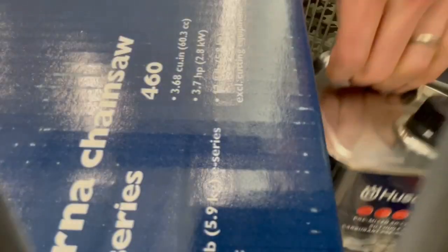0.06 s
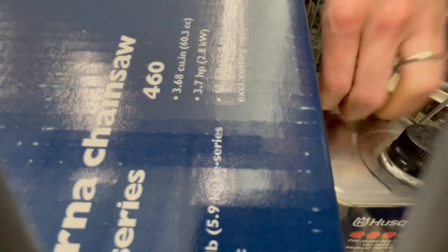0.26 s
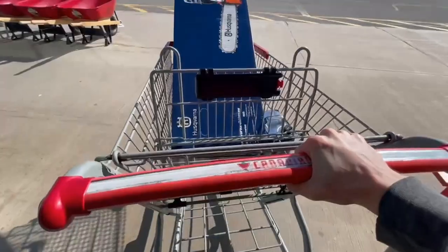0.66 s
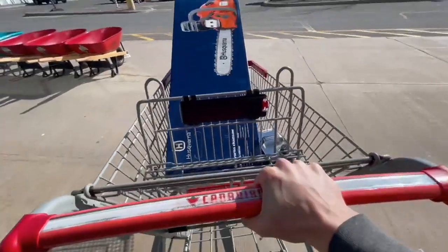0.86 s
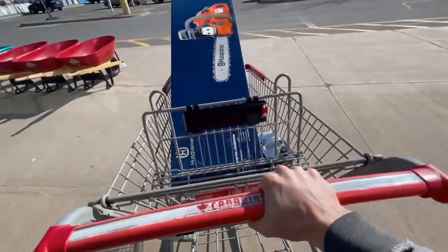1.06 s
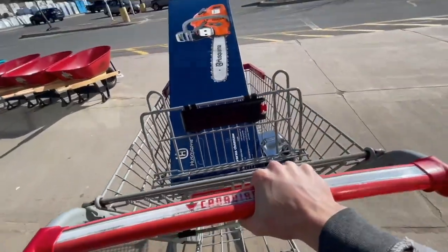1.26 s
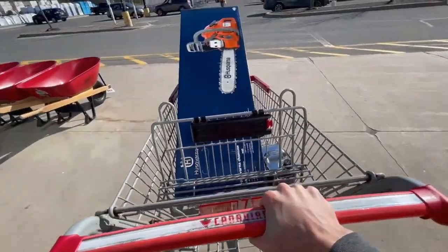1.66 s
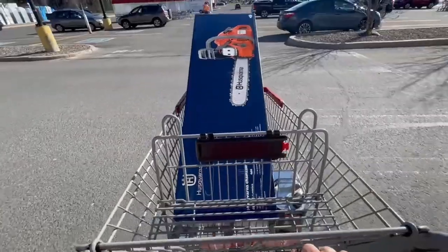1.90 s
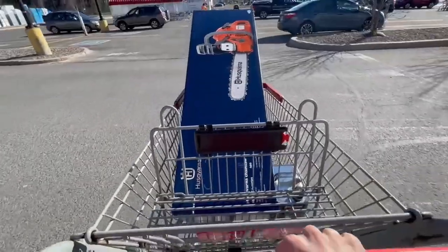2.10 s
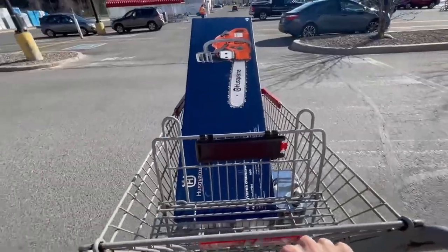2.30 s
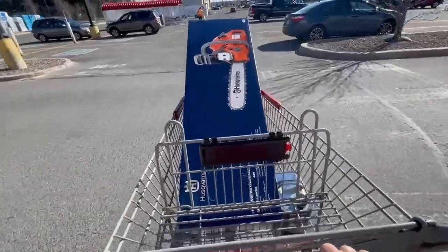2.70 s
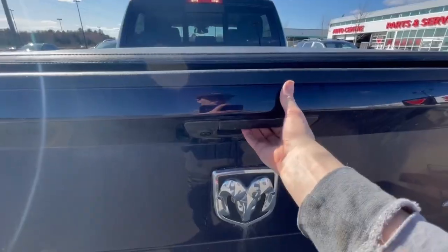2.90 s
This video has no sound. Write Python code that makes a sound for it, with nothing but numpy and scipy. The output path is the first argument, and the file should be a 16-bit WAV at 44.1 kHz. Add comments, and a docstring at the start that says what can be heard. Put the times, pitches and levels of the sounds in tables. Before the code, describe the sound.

A metal shopping cart rattling is the main sound. First, at 0.1 seconds, a box thuds into the basket, ringing and echoing in a store. From 0.6 seconds the cart rolls loudly outdoors, with chattering wires, rumbling wheels, crashing bumps and wind on the microphone. It eases around 1.4, then resumes, grittier, on asphalt. At 2.8 it cuts to a quiet car park; a tailgate handle clicks at 3 seconds.

```python
"""A thud in a large store, then a shopping cart rattling along outdoors, then a quiet car park.
A boxed load lands in the wire cart: box and basket floor ring, and the store echoes. Cut to the cart
rolling over concrete slabs on to rough asphalt: a hail of tiny knocks makes the basket wires chatter,
the frame drone and the wheels rumble, while bumps crash through the basket and wind buffets the
microphone. Cut to the car park, with a little wind and the click of a handle."""
import sys
import numpy as np
from scipy import signal
from scipy.fft import rfft, irfft, next_fast_len
from scipy.io import wavfile
from scipy.ndimage import uniform_filter1d, map_coordinates

SR = 44100
rng = np.random.default_rng(int(sys.argv[2]) if len(sys.argv) > 2 else 0)


def waveform_to_disk(signal):
    """Save audio, clipped to [-1, 1], as 16-bit WAV at the path in sys.argv[1]."""
    frames = np.transpose(np.atleast_2d(signal))
    scaled = np.clip(frames, -1, 1) * 32767
    samples = np.round(scaled).astype(np.int16)
    wavfile.write(sys.argv[1], SR, samples)


N = 134505
TIME = np.arange(N) / SR
ROLL_START_S, ROLL_END_S = .601, 2.774
HITS_PER_S, TICK_T60_S = 1400, 0.025

# the load lands and rocks (time [s], strength [dB], low-pass cutoff of the contact [Hz])
THUDS = [(.107, 1, 7150), (0.137, -16.5, 1210), (.156, -6.5, 1950), (.189, -11, 900), (0.235, -18, 900)]
# bumps that throw all the wires at once (time [s], strength [dB])
JOLTS = [(.602, -13.5), (.614, -14), (.646, -21), (.703, -4), (.792, -13), (.818, -4), (.848, -6.5),
         (.935, -12), (1.025, -19), (1.057, -9), (1.142, -13), (1.232, -25), (1.423, -28), (1.44, -19.5),
         (1.569, -19), (1.612, -11.5), (1.644, -14), (1.701, -17), (1.953, -5), (2.135, -7), (2.157, -11),
         (2.423, -29), (2.603, -21), (2.731, -9), (2.752, -4)]
# the clearest basket wires (frequency [Hz], level [dB], t60 [s])
WIRE_MODES = [(684, -4, 0.15), (831.5, 4, 0.19), (1857, 3.5, 0.17), (2433, -6.5, 0.17), (3880, -1, 0.087),
              (4370, 1.5, 0.082), (5040, 2.5, 0.25), (5410, 4, 0.13), (6120, -1, 0.12), (7900, 13, 0.19),
              (12330, 2, .1)]
# low-end tone of the wheels and of the car park gust (frequency [Hz], level [dB])
RUMBLE_TONE = [(20, -52), (38, -14), (54, 0.5), (80, 0), (110, -2), (150, -6), (300, -14.5), (900, -81.5)]
# tone of scuffs and rustles (frequency [Hz], level [dB])
RUSTLE_TONE = [(200, -5), (700, 4.5), (2200, -10), (4000, -11.5), (12000, -26.5)]
# stereo image of the rolling cart (frequency [Hz], left-right likeness [capped at +-0.97 in use])
CART_IMAGE = [(60, 0.19), (300, 0.26), (650, 0.046), (1300, 0.71), (2100, 0.76), (3200, 0.26), (4100, 0.35),
              (5600, 0.047), (6600, -0.34), (7400, -2.32), (8600, -0.26), (9700, 0.19), (10700, 1),
              (12000, 0.96), (13400, -1.61), (16000, -0.66)]
# stereo image of store and car park (frequency [Hz], left-right likeness [-1 to 1])
AMBIENT_IMAGE = [(80, 0.24), (400, 0.32), (1500, 0.24), (3200, -0.12), (12000, 0.11)]


def from_db(db):
    """Decibels to gain."""
    return 10 ** (np.asarray(db) / 20)


def rms_one(x):
    """Scale to unit rms."""
    return x / np.sqrt(np.mean(x ** 2) + 1e-20)


def unit_energy(x):
    """Scale each channel to unit energy."""
    return x / np.sqrt(np.sum(x ** 2, axis=-1, keepdims=True) + 1e-20)


def faders(rows):
    """One gain curve for each level column of (time [s], level [dB], ...)."""
    times, *columns = np.transpose(rows)
    return [from_db(np.interp(TIME, times, db)) for db in columns]


def at_hz(points, hz):
    """Read a table on a log-frequency axis."""
    freqs, values = np.transpose(points)
    return np.interp(np.log(hz + 1), np.log(freqs), values)


def convolve(x, response):
    """Play a signal through a response."""
    return signal.fftconvolve(np.atleast_2d(x), response, axes=-1)[:, :N]


def colour(x, tone):
    """Minimum-phase EQ with the given tone curve; white noise keeps its power."""
    size = 2 * next_fast_len(N, True)
    magnitude = rms_one(from_db(at_hz(tone, np.fft.rfftfreq(size, 1 / SR))))
    cepstrum = irfft(np.log(magnitude))
    cepstrum[1:size // 2] *= 2
    cepstrum[size // 2 + 1:] = 0
    return irfft(rfft(x, size) * np.exp(rfft(cepstrum)))[..., :N]


def stereo(pair, image):
    """Two unrelated signals become mid and side, balanced by frequency."""
    size = 2 * next_fast_len(N, True)
    alike = np.clip(at_hz(image, np.fft.rfftfreq(size, 1 / SR)), -.97, .97)
    mid, side = irfft(rfft(pair, size) * np.sqrt([(1 + alike) / 2, (1 - alike) / 2]))[:, :N]
    return np.array([mid + side, mid - side])


def drift(hz):
    """Slow random modulation at unit rms."""
    pole = np.exp(-2 * np.pi * hz / SR)
    return rms_one(signal.lfilter([1], [1, -2 * pole, pole * pole], rng.standard_normal(N + SR))[SR:])


def clicks(rows):
    """Impulses from (time [s], level [dB])."""
    out = np.zeros(N)
    for s, db in rows:
        out[int(s * SR)] += from_db(db)
    return out


def knocks(per_s, spread_db=2):
    """Random contacts of uneven strength, at unit rms."""
    sizes = from_db(spread_db * np.minimum(rng.exponential(1, N), 4)) * rng.choice([-1, 1], N)
    return rms_one(sizes * (rng.random(N) < per_s / SR))


def burst(t60):
    """Countless short modes blur into a pair of dying noises."""
    t = TIME[:SR // 6]
    return unit_energy(rng.standard_normal((2, len(t))) * from_db(-60 * t / t60))


def ringing(modes):
    """Modes (frequency [Hz], level [dB], t60 [s]) reach two points with random phases."""
    t = TIME[:SR // 6]
    phases = rng.uniform(0, 2 * np.pi, (len(modes), 2, 1))
    return unit_energy(sum(from_db(db - 60 * t / t60) * np.sin(2 * np.pi * hz * t + phase)
                           for (hz, db, t60), phase in zip(modes, phases)))


def bonks(rows, t60, attack_s=0.0047):
    """Short, solid low tones from (time [s], level [dB], pitch [Hz])."""
    out = 0
    for s, db, hz in rows:
        t = np.maximum(TIME - s, 0)
        envelope = from_db(db - 60 * t / t60) * (1 - np.exp(-t / attack_s))
        out = out + envelope * np.sin(2 * np.pi * hz * t)
    return out


def air(tone, db=0):
    """A steady, wide bed of noise."""
    return from_db(db) * stereo(colour(rng.standard_normal((2, N)), tone), AMBIENT_IMAGE)


def car_park():
    """Open air, a puff of wind on the microphone and a handle being gripped."""
    # outdoor bed and handle tone (frequency [Hz], level [dB])
    air_tone = [(25, -15), (60, 0.5), (110, 1), (180, -11), (330, -6), (520, -17.5), (900, -18),
                (1400, -29), (3000, -40), (7000, -52), (14000, -54)]
    handle_tone = [(300, 12), (900, -1.5), (2200, -4), (5000, -16.5), (12000, -24)]
    # puff of wind (time [s], level [dB], half length [s])
    gusts = [(2.86, -31.5, 0.044)]
    # faint rustle on the way to the handle (time [s], level [dB])
    rustle_level = [(2.8, -51.5), (2.875, -64), (2.895, -53), (2.97, -53), (3.03, -43)]
    # fingers on the handle, then the latch (time [s], level [dB])
    handle_clicks = [(2.9, -23), (2.91, -21.5), (2.94, -27), (3.046, -5.5)]
    gust = sum(from_db(db) * np.exp(-((TIME - s) / half_s) ** 2) for s, db, half_s in gusts)
    handle = colour(convolve(clicks(handle_clicks), burst(t60=0.1)), handle_tone)
    rustle, = faders(rustle_level)
    background = air(air_tone, db=-37) + rustle * air(RUSTLE_TONE) + gust * air(RUMBLE_TONE)
    return background + from_db(12) * stereo(handle, AMBIENT_IMAGE)


def store_air():
    """The steady room tone of the store."""
    # indoor bed (frequency [Hz], level [dB])
    air_tone = [(18, -28), (30, 3.5), (336, -2.5), (1490, -21.5), (1880, -22), (2630, -30), (3870, -25),
                (12600, -45.5), (14000, -60)]
    return air(air_tone, db=-41.5)


def store_echo():
    """Diffuse reverb of the store, with a decay time for each octave."""
    # reverb decay (frequency [Hz], t60 [s])
    decay = [(60, 1), (160, 1), (420, 1.0), (1500, 0.88), (2900, 0.42), (7700, 0.46)]
    t, out = TIME[:SR], 0
    for low_hz in 30 * 2 ** np.arange(9):
        octave = signal.butter(2, [low_hz, 2 * low_hz], "band", fs=SR, output="sos")
        band = signal.sosfilt(octave, rng.standard_normal((2, SR)))
        out = out + band * from_db(-60 * t / at_hz(decay, low_hz * np.sqrt(2)))
    build_up = 1 - np.exp(-t / 0.0076)
    return unit_energy(out * build_up)


def scuff():
    """The load scuffs faintly in the hand before it drops."""
    # scuff envelope (time [s], level [dB])
    scuff_level = [(.012, -72), (.018, -40), (.04, -55), (.095, -50.5), (.106, -30), (.12, -80)]
    level, = faders(scuff_level)
    return level * air(RUSTLE_TONE)


def box_ring():
    """The landing sets box and basket floor ringing; the two lowest modes beat."""
    # box and basket floor (frequency [Hz], level [dB], t60 [s])
    box_modes = [(79.8, 2, 0.3), (96, 2, 0.34), (133.4, -9, 0.52), (242, 6, 0.13), (288.3, -4, 0.74),
                 (322.5, -8.5, 0.92), (351, -7, 0.39), (476, -2, 0.075), (558, -12, 1.15), (579, -4, 0.85),
                 (609, -8, 0.63), (833, -5, 0.24), (1270, -9.5, 0.51), (1650, -13.5, 0.28),
                 (2497, -9, 0.12), (5280, -14, 0.12), (4895, -39.5, 3.6)]
    t = np.maximum(TIME - THUDS[0][0], 0)
    out = 0
    for k, (hz, db, t60) in enumerate(box_modes):
        pan = from_db(-6) * rng.uniform(-1, 1) * np.array([[1], [-1]])
        out = out + (-1) ** k * (1 + pan) * from_db(db - 60 * t / t60) * np.sin(2 * np.pi * hz * t)
    return out


def thud():
    """The load lands with a crack, the box booms as it rocks back, and the store echoes."""
    # tone of the impact and of its reverb tail (frequency [Hz], level [dB])
    crack_tone = [(60, -11), (165, -12), (260, 5.5), (410, -1.5), (550, 9), (730, -5), (1000, -4),
                  (1650, -5), (2150, -19), (2600, -17.5), (3600, -20), (5200, -19), (8500, -15.5),
                  (15000, -29)]
    tail_tone = [(50, 0.5), (100, 3.5), (175, -6.5), (320, -1.5), (430, -4), (580, -4), (750, -2),
                 (1400, -9), (2200, -16.5), (6000, -19.5), (14000, -33.5)]
    blows = sum(signal.lfilter(*signal.butter(1, hz, fs=SR), clicks([(s, db)]) + 1e-18)
                for s, db, hz in THUDS)
    crack = from_db(19) * colour(convolve(blows, burst(t60=0.13)), crack_tone)
    tail = from_db(12.5) * colour(convolve(blows, store_echo()), tail_tone)
    boom = bonks([(.175, -11.5, 98)], t60=0.11)
    return from_db(-15) * box_ring() + boom + stereo(crack + tail, AMBIENT_IMAGE)


def wind(edge_ratio=1.63):
    """Eddies hit the two microphone ports separately; the small ones sound higher."""
    # buffets while rolling (time [s], level [dB], half length [s], band centre [Hz])
    buffets = [(0.634, -22, 0.021, 90), (0.639, -23.5, 0.01, 810), (0.707, -25, 0.023, 100),
               (1.09, -21, 0.026, 121), (2.026, -23.5, 0.0048, 800), (2.115, -30.5, 0.088, 840),
               (2.246, -17.5, 0.016, 97.5), (2.3, -19, 0.033, 79), (2.309, -29.5, 0.019, 940)]
    out = 0
    for s, db, half_s, hz in buffets:
        band = signal.butter(2, [hz / edge_ratio, hz * edge_ratio], "band", fs=SR, output="sos")
        swell = np.exp(-((TIME - s) / half_s) ** 2)
        eddy = swell * signal.sosfilt(band, rng.standard_normal((2, N)))
        out = out + from_db(db) * np.linalg.norm(swell) * unit_energy(eddy)
    return out


def wheels(thump_hz=60.7, thump_t60_s=0.2):
    """Hard wheels rumble, thump into joints and shudder briefly."""
    # rumble envelope (time [s], level [dB])
    rumble_level = [(0.6, -31), (0.72, -30), (0.76, -18), (0.79, -30), (0.82, -17), (0.95, -32),
                    (1.01, -38), (1.07, -41), (1.12, -27.5), (1.18, -19.5), (1.35, -21.5), (1.38, -24),
                    (1.48, -24.5), (1.52, -22), (1.71, -22.5), (1.73, -31.5), (2.15, -24), (2.2, -29),
                    (2.24, -26.5), (2.5, -29.5), (2.75, -20.5), (2.77, -42)]
    # drops into joints and dents (time [s], level [dB])
    drops = [(.75, -18), (.812, -17), (1.185, -12), (1.3, -14), (1.375, -11), (1.69, -20), (2.24, -19),
             (2.3, -21), (2.725, -20)]
    # one wheel shudders on the way to the asphalt (time [s], level [dB])
    shudder_level = [(1.46, -55), (1.52, -21.5), (1.62, -19.5), (1.71, -30), (1.75, -58)]
    rolling, = faders(rumble_level)
    ground = np.array([knocks(HITS_PER_S), knocks(HITS_PER_S)])
    rumble = from_db(-0.5) * rolling * rms_one(colour(ground, RUMBLE_TONE))
    t = TIME[:SR // 2]
    thump = np.sin(2 * np.pi * thump_hz * t) * from_db(-60 * t / thump_t60_s)
    shaking, = faders(shudder_level)
    shudder_hz = 106 + 4.8 * drift(hz=18)
    shudder = shaking * np.sin(2 * np.pi * np.cumsum(shudder_hz) / SR)
    return stereo(rumble, CART_IMAGE) + convolve(clicks(drops), thump[None]) + shudder


def frame_drone():
    """Dense knocks keep the low modes of the tube frame droning."""
    # drone envelope (time [s], level [dB])
    drone_level = [(0.6, -24), (0.62, -26), (0.67, -37), (0.74, -16), (0.77, -26), (0.83, -19), (0.9, -23),
                   (0.98, -27), (1.08, -23.5), (1.16, -21), (1.24, -26), (1.39, -31), (1.58, -32.5),
                   (1.66, -19), (1.74, -29), (1.95, -26.5), (2.2, -28.5), (2.5, -31), (2.73, -33),
                   (2.77, -48)]
    # tube frame (frequency [Hz], level [dB], t60 [s])
    frame_modes = [(183, 2, 0.069), (210.5, 0.5, 0.063), (245.8, -1.5, 0.14), (315, -6, 0.029),
                   (382, -5.5, 0.046)]
    level, = faders(drone_level)
    ground = [knocks(HITS_PER_S), knocks(HITS_PER_S)]
    return from_db(0.5) * level * rms_one(convolve(ground, ringing(frame_modes)))


def wire_panels(low_hz, high_hz, panels, modes_each):
    """Loose panels rattle by turns, each with its own modes, which bend as the basket flexes."""
    spread_db, mean_t60_s = 8.5, 0.093
    flex_hz, swing_db, bend_share = 3, 3, .008
    out = 0
    for _ in range(panels):
        modes = [(low_hz + (high_hz - low_hz) * (k + offset) / modes_each,
                  spread_db * strength, mean_t60_s * (.5 + sustain))
                 for k, (offset, sustain, strength) in enumerate(rng.random((modes_each, 3)))]
        looseness = from_db(swing_db * drift(flex_hz))
        hits = looseness * knocks(HITS_PER_S / panels)
        panel = convolve(hits, ringing(modes) + from_db(-6) * burst(TICK_T60_S))
        playhead = np.cumsum(1 + bend_share * drift(flex_hz))
        out = out + np.array([map_coordinates(side, [playhead], order=2, mode="mirror") for side in panel])
    power = uniform_filter1d(np.mean(out ** 2, axis=0), SR // 16)
    return out / np.sqrt(power + 1e-3)  # ride the sum to an even level


def jolt_rings(mix_spread_db=2.5):
    """Each jolt sets the basket wires ringing in a different mix."""
    out = np.zeros((2, N + SR))
    for s, db in JOLTS:
        ring = ringing([(hz, level + mix_spread_db * rng.standard_normal(), t60)
                        for hz, level, t60 in WIRE_MODES])
        start = int(s * SR)
        out[:, start:start + ring.shape[1]] += from_db(5.5 + db) * ring
    return out[:, :N]


def basket(chatter, clatter, asphalt_s=1.556):
    """Wires chatter, crash on bumps and sizzle on the grit of the asphalt."""
    # tone of the bright wires and of the fine grit (frequency [Hz], level [dB])
    chatter_tone = [(700, -10), (1800, -3), (3200, -3.5), (4800, 2.5), (7300, 0.5), (9500, -4),
                    (11000, -5.5), (13000, -10), (15500, -5.5)]
    grit_tone = [(3000, -28), (6000, -2.5), (8500, 1.5), (12000, -1.5), (15500, -5)]
    wires = from_db(2.5) * chatter * wire_panels(1003, 16000, panels=10, modes_each=32)
    crashes = from_db(9) * convolve(clicks(JOLTS), burst(t60=0.14))
    clear_wires = rms_one(convolve(knocks(HITS_PER_S), ringing(WIRE_MODES)))
    rings = from_db(-8.5) * np.sqrt(chatter * clatter) * clear_wires
    on_asphalt = np.clip((TIME - asphalt_s) / 0.14, 0, 1)
    ticks = convolve(knocks(per_s=3400), burst(TICK_T60_S))
    grit = from_db(1) * on_asphalt * chatter * colour(ticks, grit_tone)
    return colour(wires + crashes, chatter_tone) + rings + jolt_rings() + grit


def rolling_cart():
    """The ground shakes wheels, frame, loose panels and basket."""
    # basket shake on each surface (time [s], wire chatter [dB], lower clatter [dB])
    concrete = [(0.605, -29, -25), (0.629, -26, -35), (0.671, -35.5, -31.5), (0.715, -24.5, -26.5),
                (0.773, -36.5, -30.5), (0.797, -24, -24.5), (0.845, -23, -26.5), (0.92, -32.5, -29),
                (1.011, -47.5, -35.5), (1.073, -26.5, -27), (1.103, -25.5, -26.5), (1.41, -50, -41),
                (1.44, -54, -37), (1.543, -53, -47), (1.571, -47, -36), (1.591, -50, -40.5),
                (1.627, -28, -28.5), (1.651, -23, -28.5), (1.69, -33.5, -35.5)]
    asphalt = [(1.71, -26, -28.5), (2.054, -26.5, -29.5), (2.154, -24.5, -26), (2.32, -30, -35),
               (2.508, -29, -31), (2.584, -35.5, -31.5), (2.61, -32, -32.5), (2.72, -31.5, -31.5),
               (2.746, -25, -31.5), (2.768, -33, -34.5)]
    # midrange tone of the loose panels (frequency [Hz], level [dB])
    clatter_tone = [(150, -5), (350, 4.5), (550, 1.5), (850, 2), (1250, -4), (1700, -8.5), (2500, -7),
                    (5000, -22.5)]
    # bumps that reach the frame (time [s], level [dB], pitch [Hz])
    frame_bumps = [(0.824, -8.5, 250), (1.085, -21.5, 248), (1.15, -13, 177), (1.649, -9, 232.6),
                   (2.011, -9, 223), (2.243, -16.5, 175)]
    flutter = from_db(1.07 * drift(hz=24.6))
    chatter, clatter = faders(list(concrete) + list(asphalt)) * flutter
    panels = rms_one(colour(wire_panels(304.4, 4000, panels=8, modes_each=30), clatter_tone))
    body = from_db(2) * clatter * panels + frame_drone()
    low_end = stereo(body, CART_IMAGE) + wheels() + bonks(frame_bumps, t60=0.12)
    lean_left = from_db([[0.85], [-0.85]])
    return stereo(basket(chatter, clatter), CART_IMAGE) + lean_left * low_end


def scene():
    """Store, rolling cart and car park, joined by hard cuts."""
    outdoors = np.clip((TIME - ROLL_START_S) / 0.00075, 0, 1)
    stopped = np.clip((TIME - ROLL_END_S) / 0.003, 0, 1)
    store = thud() + scuff() + store_air()
    ride = rolling_cart() + wind()
    return (1 - outdoors) * store + outdoors * (1 - stopped) * ride + stopped * car_park()


def record(dry):
    """Cut the lowest bass, clip the peaks, then cut the very top."""
    low_cut = signal.butter(2, 24, "high", fs=SR, output="sos")
    high_cut = signal.ellip(10, .1, 80, 15750, fs=SR, output="sos")
    clipped = np.clip(signal.sosfilt(low_cut, dry), -.95, .95)
    return signal.sosfilt(high_cut, clipped)


dry = scene()
out = record(dry)
waveform_to_disk(out)
```